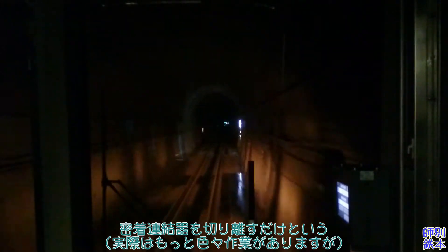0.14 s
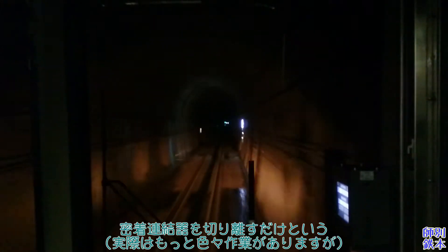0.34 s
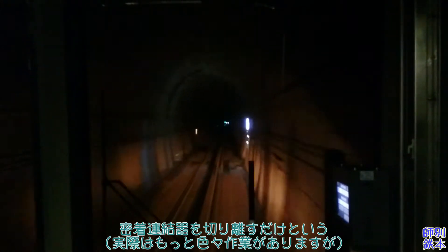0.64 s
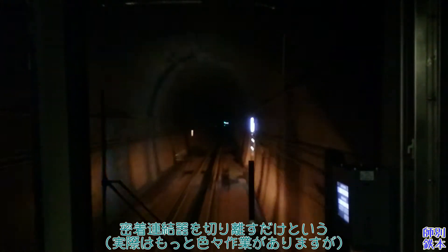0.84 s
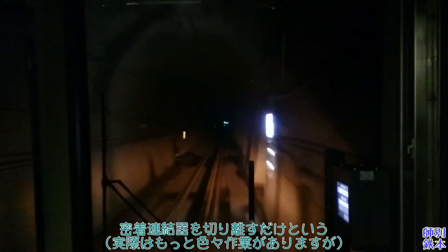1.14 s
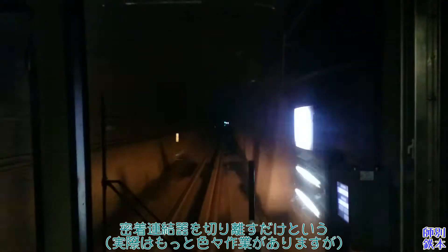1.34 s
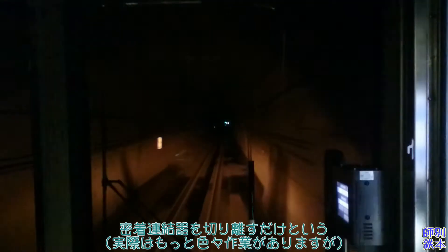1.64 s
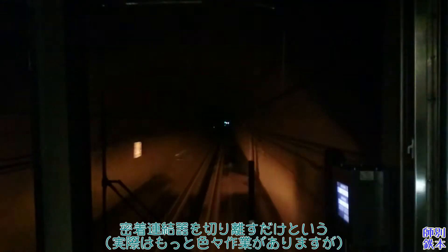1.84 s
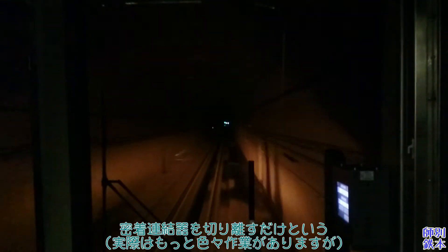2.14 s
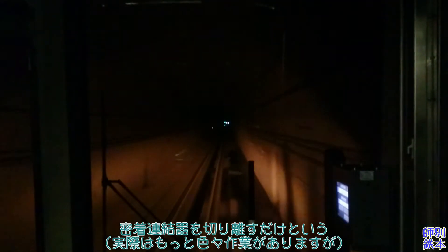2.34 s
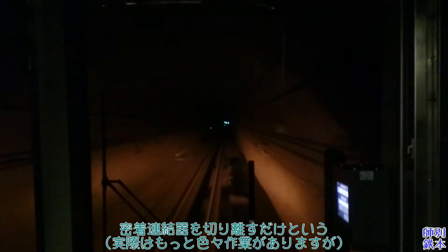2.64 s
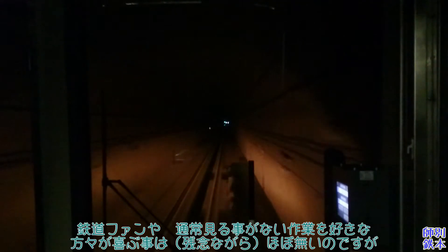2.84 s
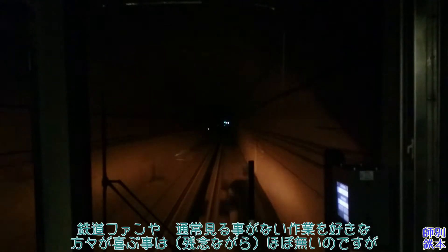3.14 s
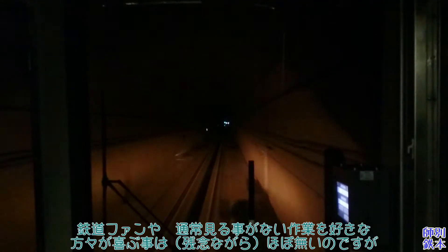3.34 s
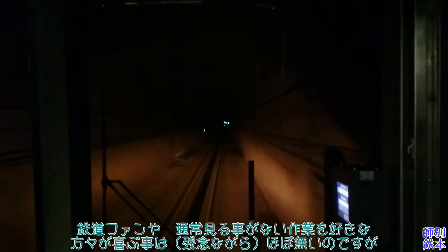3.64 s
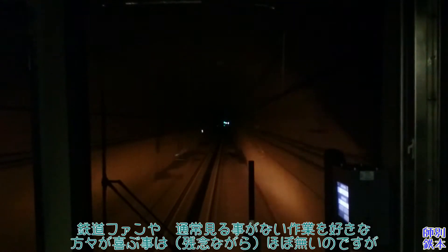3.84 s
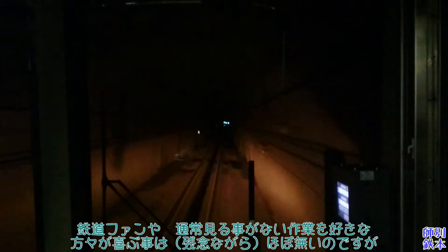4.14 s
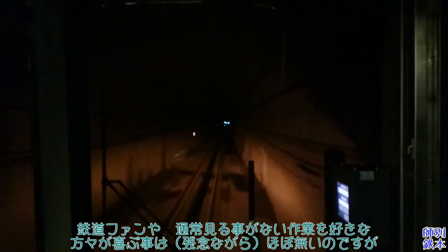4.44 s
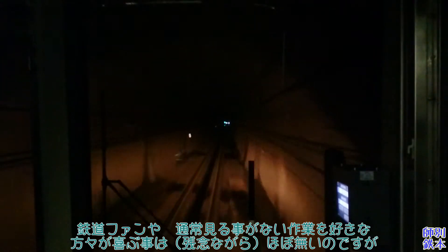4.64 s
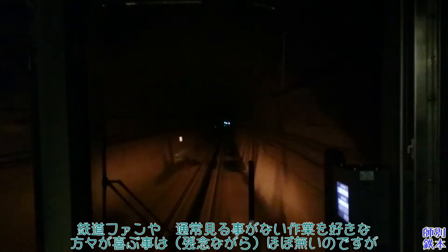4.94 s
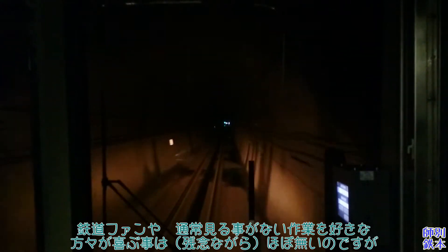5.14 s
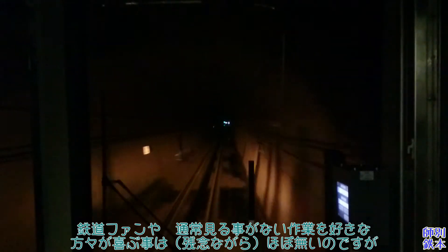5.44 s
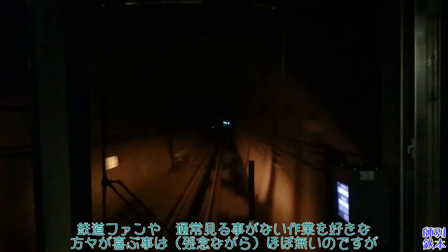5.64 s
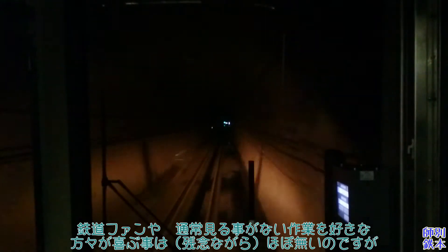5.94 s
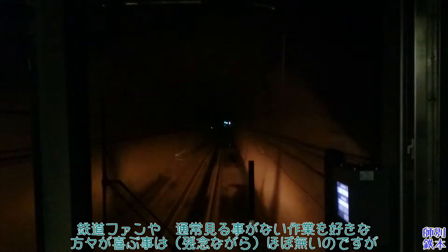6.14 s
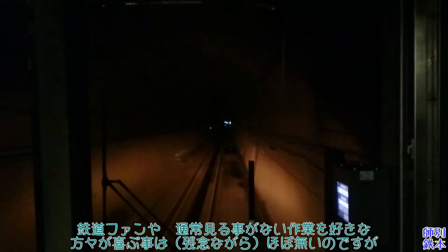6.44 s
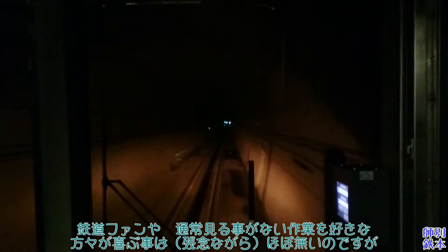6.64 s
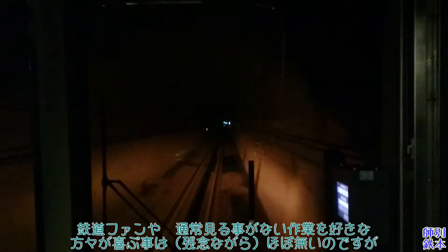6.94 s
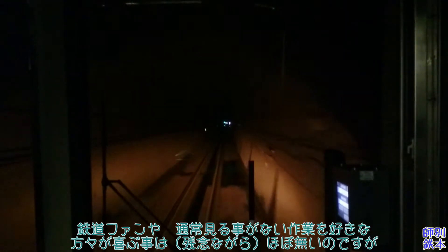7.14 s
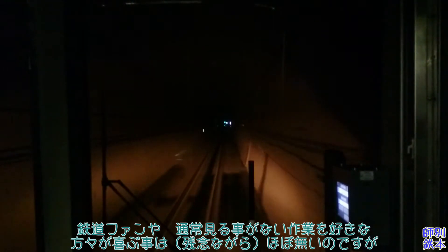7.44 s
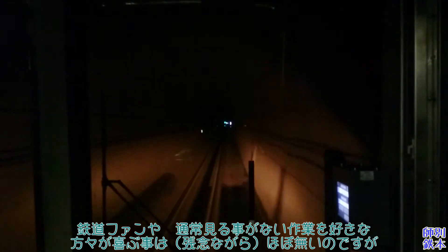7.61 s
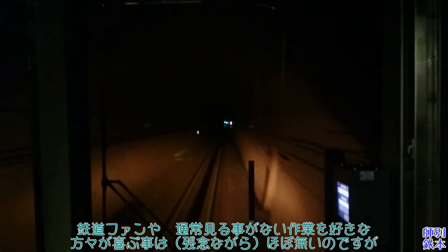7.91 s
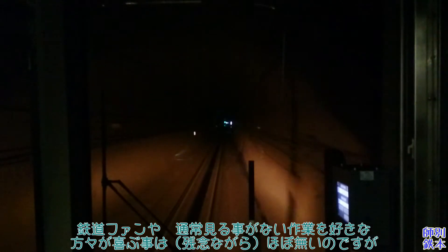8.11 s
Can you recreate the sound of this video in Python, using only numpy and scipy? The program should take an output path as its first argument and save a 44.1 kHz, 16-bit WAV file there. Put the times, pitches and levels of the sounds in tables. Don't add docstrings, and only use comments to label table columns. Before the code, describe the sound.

Inside an electric train cab in a tunnel, a deep uneven floor throb rumbles steadily with dull rail-joint thumps, gear hum and faint whine.

```python
import sys
import numpy as np
from scipy import signal
from scipy.fft import rfft, irfft, next_fast_len
from scipy.io import wavfile
from scipy.ndimage import uniform_filter1d

SR = 44100
rng = np.random.default_rng(int(sys.argv[2]) if len(sys.argv) > 2 else 0)


def generate_wav(sig):
    pcm = np.round(np.clip(np.atleast_2d(sig).T, -1, 1) * 32767).astype(np.int16)
    wavfile.write(sys.argv[1], SR, pcm)


def elevation(decibels):
    levels = np.asarray(decibels, float)
    return 10 ** (levels / 20)


N = 364707

# [t/s, peak level/dB, f/Hz, length/ms]
THROBS = [(0.104, -13.5, 102.5, 40), (0.191, -12, 107, 47), (0.409, -11.5, 104, 27),
          (0.483, -16.5, 105.4, 29), (0.589, -13, 125.6, 29), (1.212, -12.5, 115.5, 20),
          (1.389, -14.5, 102, 22), (1.445, -11.5, 109, 38), (1.866, -13, 108.3, 85), (2.328, -13, 106, 28),
          (2.803, -16, 108, 34), (2.983, -15.5, 108.5, 29), (3.087, -15, 116.4, 48), (3.48, -14.5, 113, 86),
          (3.544, -12, 103.4, 50), (3.841, -14.5, 110.8, 37), (4.062, -14.5, 120, 22),
          (4.549, -12, 105, 13), (4.632, -9, 107, 28), (4.868, -13.5, 104.4, 70), (5.086, -14.5, 108.2, 58),
          (5.518, -15, 111, 15), (5.682, -13.5, 108.3, 36), (6.181, -15, 98, 37), (6.457, -16, 119, 37),
          (6.585, -11, 111, 19), (6.871, -12.5, 107, 56), (7.203, -18, 108, 81), (7.69, -14.5, 119, 23),
          (7.934, -16, 112, 20)]
# [t/s, half length/s, depth/dB]
LULLS = [(0.022, 0.11, 15.5), (0.26, 0.031, 4.5), (0.843, 0.057, 1.5), (1.06, .08, 2.5), (2.699, .08, 1.5),
         (6.515, .03, 5), (1.659, 0.074, 3), (2.03, 0.026, 5), (3.348, .06, 5.5), (3.918, 0.054, 1.5),
         (4.287, 0.028, 5.5), (4.799, 0.031, 2.5), (5.334, .08, 0.5), (7.149, .04, 13), (7.746, 0.075, 3.5),
         (8.096, 0.056, 9.5), (8.26, 0.029, 9.5)]
# [t/s, sway lift/dB, panel lift/dB]
JOLTS = [(0.15, 2.5, 5.5), (0.39, 2.5, 1), (0.58, 5.5, 1.5), (1.12, 8, -3), (1.66, 2, 1), (1.821, 12, 9),
         (2.3, 1.5, 3.5), (2.781, 10, 4.5), (3.1, 11, 6), (3.41, 11, 5.5), (3.75, 8, 0.5),
         (4.06, -3.5, 7.5), (4.25, 8.5, 3), (4.4, 5.5, 3), (4.549, 8, 5.5), (5.04, 6.5, 3.5),
         (6.45, 4.5, -1.5), (7.18, 8, 4.5), (7.55, 3.5, 0.5), (7.68, 7.5, -1), (7.94, 6, 3), (8.14, 8, 1)]
# [f/Hz, lead/rad]
LEFT_LEAD = [(32, .92), (70, .56), (90, .4), (107, .46), (130, .75), (200, .06), (300, -.5), (600, 0)]
SMALL_DB = -20.5
JOLT_S = 0.045


def at_hz(points, hz):
    table_hz, value = np.transpose(points)
    return np.interp(np.log(hz), np.log(table_hz), value)


def in_time(rows):
    s, *columns = np.transpose(rows)
    return [np.interp(np.arange(N) / SR, s, column) for column in columns]


def bumps(rows):
    step = np.arange(0, N + 100, 100) / SR
    humps = sum(top * np.exp(-((step - s) / wide) ** 2) for s, wide, top in rows)
    return np.interp(np.arange(N) / SR, step, humps)


def drift(rate):
    targets = rng.standard_normal(400)
    return np.interp(np.arange(N) / SR * rate, np.arange(400), targets)


def rms_one(x):
    return x / np.sqrt(np.mean(np.mean(np.atleast_2d(x), axis=0) ** 2))


def modes_gain(modes, hz, steep):
    power = 0
    for f_hz, width, db in modes:
        power = power + elevation(db) ** 2 / (1 + (2 * (hz - f_hz) / width) ** 2) ** steep
    return np.sqrt(power)


def stereo_noise(gain_at):
    # [f/Hz, level/dB]
    balance = [(35, -6), (65, -7), (150, -8.5), (200, 0), (245, -10.5), (450, -4.5), (650, -3.5),
               (1300, -4), (2400, -5.5), (4200, 0), (5700, -6.5), (11500, 4), (13300, 2), (15200, -11)]
    # [f/Hz, likeness 0-1]
    likeness = [(30, .985), (130, .99), (200, .9), (290, .8), (400, .62), (600, .1), (1200, 0), (16000, 0)]
    size = next_fast_len(N)
    hz = np.maximum(np.fft.rfftfreq(size, 1 / SR), 1)
    mid, side = rfft(rng.standard_normal((2, size)))
    alike = np.clip(at_hz(likeness, hz), 0, 1)
    lean = elevation(at_hz(balance, hz) / 2)
    mid, side = np.sqrt(1 + alike) * mid, np.sqrt(1 - alike) * side
    left = (mid + side) * lean * np.exp(1j * at_hz(LEFT_LEAD, hz))
    right = (mid - side) / lean
    return rms_one(irfft(np.array([left, right]) * gain_at(hz), size)[:, :N])


def tone(hz, level_db, lean_db, wander_hz, flutter_db):
    phase = 2 * np.pi * np.cumsum(hz + wander_hz * drift(6)) / SR
    channels = []
    for side in (1, -1):
        level = elevation(level_db + side * lean_db / 2 + flutter_db * drift(9.8))
        channels.append(level * np.sqrt(2) * np.sin(phase + rng.uniform(0, 2 * np.pi)))
    return np.array(channels)


def all_throbs():
    gap_s = 0.056
    luck = rng.standard_normal((int(N / SR / gap_s), 4))
    s = gap_s * (np.arange(len(luck)) + 0.5 + 0.2 * np.clip(luck[:, 0], -2, 2))
    longer = np.clip(luck[:, 3], -1.5, 1.5)
    ducking_db = bumps(LULLS) + bumps([(at_s, ms / 1100, 14) for at_s, _, _, ms in THROBS])
    db = SMALL_DB + 1.8 * luck[:, 1] - ducking_db[(s * SR).astype(int)]
    db = db - 4 * longer
    hz = 107.5 + 3.6 * luck[:, 2]
    ms = 53.3 * np.exp(0.54 * longer)
    return [*THROBS, *np.transpose([s, db, hz, ms])]


def floor_throbs():
    floor_hz, hum_db = 107.5, -31
    throbs = all_throbs()
    out = np.zeros((2, N))
    slips = 1.25 * rng.standard_normal((len(throbs), 1))
    for (s, peak_db, hz, ms), slip in zip(throbs, slips):
        phase = 2 * np.pi * floor_hz * s + slip
        reach = ms / 1000 * 0.9
        at = np.arange(max(int((s - reach) * SR), 0), min(int((s + reach) * SR), N))
        t = at / SR - s
        swell = elevation(peak_db - 0.84) * np.abs(np.cos(np.pi * t / reach / 2)) ** 1.21
        out[:, at] += swell * np.sin(2 * np.pi * hz * t + phase + [[at_hz(LEFT_LEAD, hz)], [0]])
    swing = 2 * np.pi * floor_hz * np.arange(N) / SR + [[at_hz(LEFT_LEAD, floor_hz)], [0]]
    out = out + elevation(hum_db - bumps(LULLS)) * np.sin(swing)
    return out * elevation([[-4.3], [2.9]])


def shaken_modes(modes, level_db, even, span_s):
    x = stereo_noise(lambda hz: modes_gain(modes, hz, steep=1.6))
    width = int(span_s * SR)
    power = uniform_filter1d(uniform_filter1d(x.mean(0) ** 2, width), width)
    return elevation(level_db) * rms_one(x / (power + 0.02) ** (even / 2))


def car_body(gain_db):
    # [f/Hz, width/Hz, level/dB]
    boom = [(107, 18, -1), (124.5, 14, 7)]
    sway = [(37, 8, -8.5), (56.2, 6.6, -4), (69.1, 11, -1)]
    panels = [(147.8, 22, 1.5), (167, 30, -10.5), (196.4, 42, -4.5), (238.3, 18, -4.5), (280.8, 21, -9),
              (298.7, 21, -14), (316.3, 41, -16.5), (392.7, 24, -16)]
    pull_db = 0.6 * gain_db
    sway_db = -35 + pull_db + bumps([(s, JOLT_S, db) for s, db, _ in JOLTS])
    panel_db = -34.5 + pull_db + bumps([(s, JOLT_S, db) for s, _, db in JOLTS])
    out = shaken_modes(boom, -32, even=0.1, span_s=0.043)
    out = out + shaken_modes(sway, sway_db, even=0.46, span_s=0.065)
    return out + shaken_modes(panels, panel_db, even=0.38, span_s=0.1)


def joints():
    # [t/s, peak level/dB]
    gaps = [
        (0.076, -39.5),
        (0.177, -31),
        (0.407, -22),
        (0.577, -10.5),
        (1.853, -26),
        (4.546, -29),
        (5.684, -27),
        (6.618, -13.5),
        (7.183, -15.5),
    ]
    clicks = np.zeros(N)
    for s, peak_db in gaps:
        clicks[int(s * SR)] = elevation(peak_db - 7.5)
    out = 0
    for hz, t60 in [(150, 0.2), (205, 0.11), (265, 0.019)]:
        r, w = elevation(-60 / (t60 * SR)), 2 * np.pi * hz / SR
        out = out + signal.lfilter([0, np.sin(w)], [1, -2 * r * np.cos(w), r * r], clicks + 1e-18)
    soft = np.exp(-2 * np.pi * 400 / SR)
    return signal.lfilter([1 - soft], [1, -soft], out) * elevation([[-4], [3]])


def ringing_wheels(modes, mesh, band_db):
    hum = stereo_noise(lambda hz: modes_gain(modes, hz, steep=1.56))
    lines = sum(tone(hz, db, lean_db, wander_hz=9, flutter_db=5) for hz, db, lean_db in mesh)
    return elevation(band_db) * (hum + lines)


def running_gear(roar_db, gain_db):
    # [f/Hz, width/Hz, level/dB]
    wheel_low = [(928, 110, -1), (785, 140, -5.5), (1230, 35, -13)]
    wheel_high = [(1789, 72, -1.5), (1886, 61, -2.5), (1937, 360, -8.5)]
    # [f/Hz, level over its band/dB, left-
    # right/dB]
    mesh_low = [(857, -14, -2), (904, -10, -1), (952, -11.5, -6), (996, -17, -6)]
    mesh_high = [(1806, -9.5, -5), (2290, -18, 0)]
    # [t/s, mesh band over roar/dB, octave band over roar/dB]
    swells = [(0.0, 6.5, -2), (0.16, 15.5, 10.5), (0.66, 14, 3.5), (1.08, 13, 4.5), (1.4, 6, -3.5),
              (1.82, 10, 1.5), (3.2, 6, -0.5), (3.9, 11, 0), (4.55, 7.5, 4.5), (5.1, 13, 7.5),
              (5.75, 7, 1.5), (6.0, 10.5, 2.5), (6.55, 9, 3), (6.84, 16, 4.5), (7.16, 11, -1),
              (7.4, 11, 5.5), (7.7, 9.5, -2), (8.27, 8, 0)]
    low_db, high_db = in_time(swells)
    base_db = roar_db + 1.34 * gain_db
    low = ringing_wheels(wheel_low, mesh_low, low_db + base_db - 3)
    return low + ringing_wheels(wheel_high, mesh_high, high_db + base_db)


def traction_whine(roar_db):
    # [t/s, level over roar/dB, octave level over roar/dB]
    levels = [(0, -17, -16), (1.2, -14, -16.5), (2.5, -12, -30), (3.5, -12, -30.5), (4.5, -12.5, -16),
              (5.5, -16, -16.5), (6.5, -20.5, -18), (7.4, -16, -16.5), (8.27, -25, -24.5)]
    # [t/s, speed as a share of the mean]
    slowing = [(0, 1.0045), (8.27, .9955)]
    whine_db, octave_db = in_time(levels)
    hz = 3114 * in_time(slowing)[0]
    whine = tone(hz, roar_db + whine_db, 6, wander_hz=0.4, flutter_db=1.5)
    return whine + tone(2 * hz, roar_db + octave_db, -8, wander_hz=3, flutter_db=3.5)


def roar_level():
    # [t/s, level/dB]
    passing = [(0.0, -51), (0.28, -48.5), (0.7, -53), (1.2, -52), (1.54, -53), (1.82, -49.5), (2.6, -53.5),
               (3.5, -51), (3.64, -51), (4.4, -52.5), (4.54, -51), (5.7, -53), (6.04, -52), (6.95, -52),
               (7.2, -50.5), (7.72, -54.5), (8.0, -53.5), (8.27, -52.5)]
    jolt_db = bumps([(s, JOLT_S, sway + panels) for s, sway, panels in JOLTS])
    return in_time(passing)[0] + 0.074 * jolt_db + 0.64 * drift(14)


def tunnel_roar(roar_db):
    # [f/Hz, level per Hz/dB]
    walls = [(120, 1.5), (340, -1.5), (390, -2.5), (600, -3), (1150, -4.5), (1400, -12.5), (1620, -14),
             (2100, -14), (2400, -14.5), (3600, -21.5), (3900, -26), (4800, -26), (7000, -30.5)]
    # [f/Hz, level/dB]
    capsule = [(4800, -1), (5300, 4), (5700, 8), (6200, 3), (6600, -1.5), (8000, -14), (9800, -22.5),
               (11500, -20), (13200, -23), (15200, -27.5), (15700, -25.5)]

    def colour(hz):
        bass_cut = (hz / 120) ** 2 / (1 + (hz / 120) ** 2)
        return elevation(at_hz(walls, hz) + at_hz(capsule, hz)) * bass_cut
    return elevation(roar_db + 12) * stereo_noise(colour)


def gain_control():
    pump_db, memory_s, lag_s = 8, 0.41, 0.01
    usual = elevation(SMALL_DB - 3)
    loud = [(s, ms / 1200, elevation(db) / usual - 1) for s, db, _, ms in THROBS]
    quiet = [(s, wide, elevation(-db) - 1) for s, wide, db in LULLS]
    swing = bumps(loud + quiet)
    pull = swing - swing.mean()
    for smooth_s in (memory_s, lag_s):
        keep = np.exp(-1 / (smooth_s * SR))
        pull = signal.lfilter([1 - keep], [1, -keep], pull)
    return -pump_db * pull


def scene():
    gain_db = gain_control()
    free_roar_db = roar_level()
    roar_db = free_roar_db + gain_db
    car = floor_throbs() + car_body(gain_db) + joints()
    gear = running_gear(free_roar_db, gain_db) + traction_whine(roar_db)
    return car + gear + tunnel_roar(roar_db)


def top_cut(x):
    return signal.sosfilt(signal.butter(12, 15730, fs=SR, output="sos"), x)


def record(dry):
    x = signal.sosfilt(signal.butter(4, 27, "high", fs=SR, output="sos"), dry)
    x = x * np.minimum((N - np.arange(N)) / (0.004 * SR), 1)
    return top_cut(0.75 * np.tanh(x / 0.72))


dry = scene()
out = record(dry)
generate_wav(out)
```